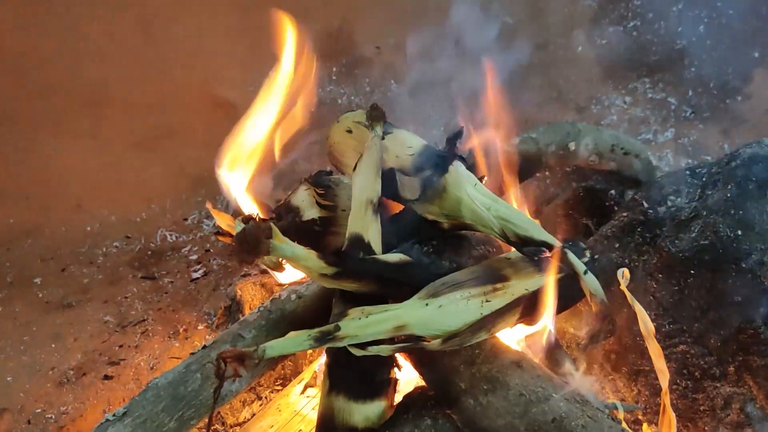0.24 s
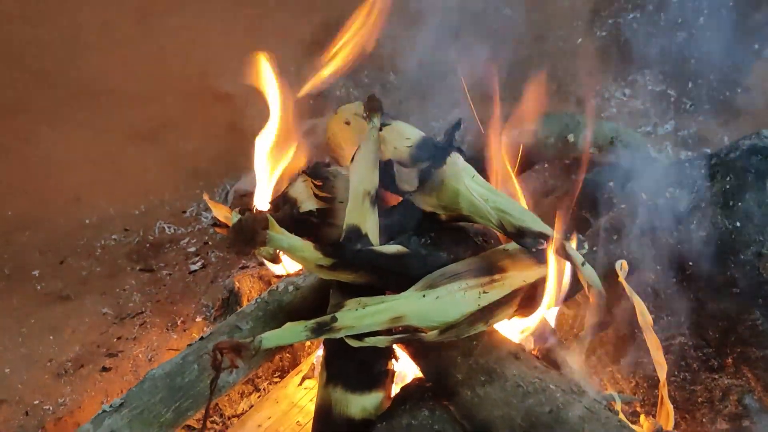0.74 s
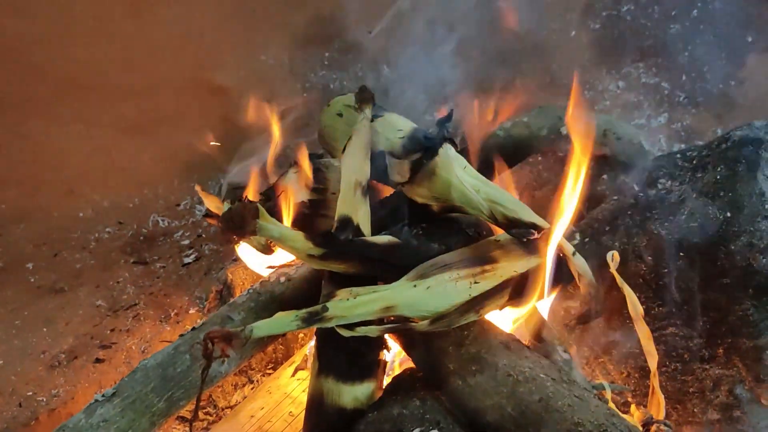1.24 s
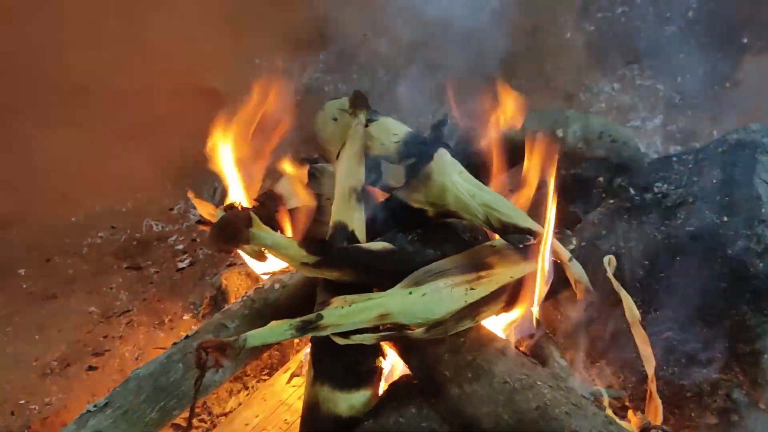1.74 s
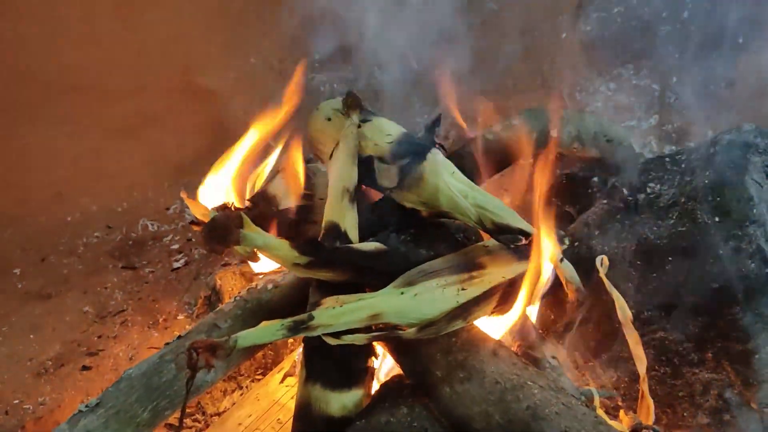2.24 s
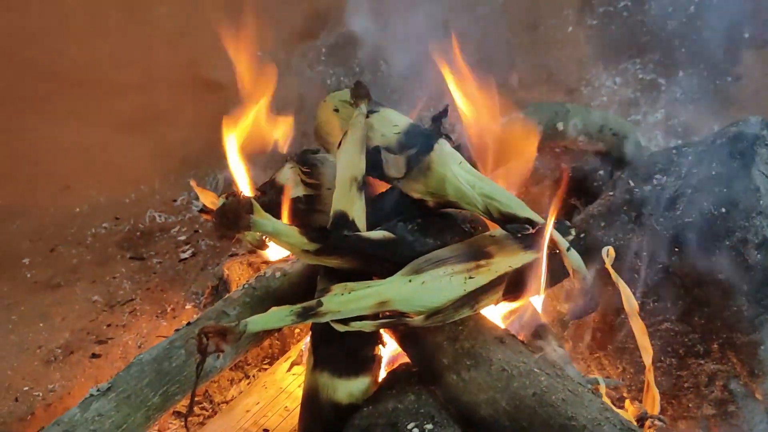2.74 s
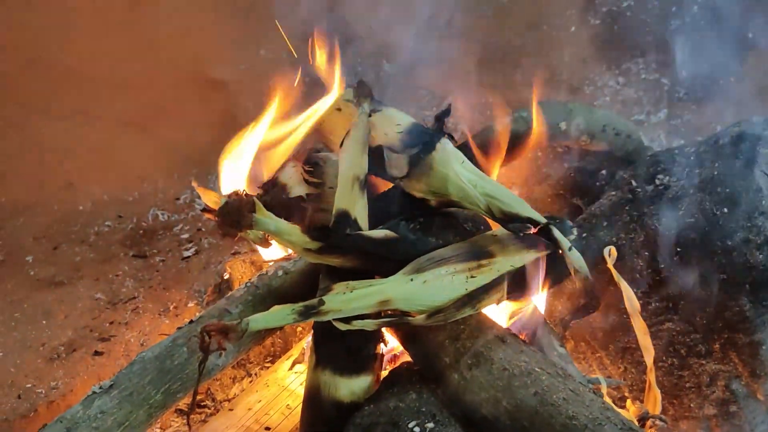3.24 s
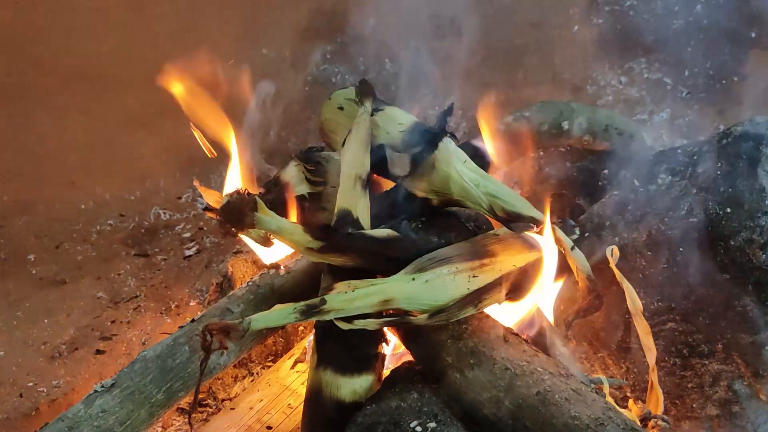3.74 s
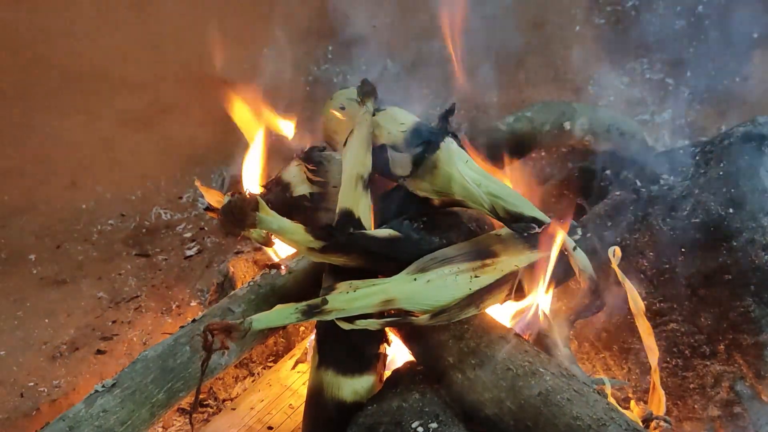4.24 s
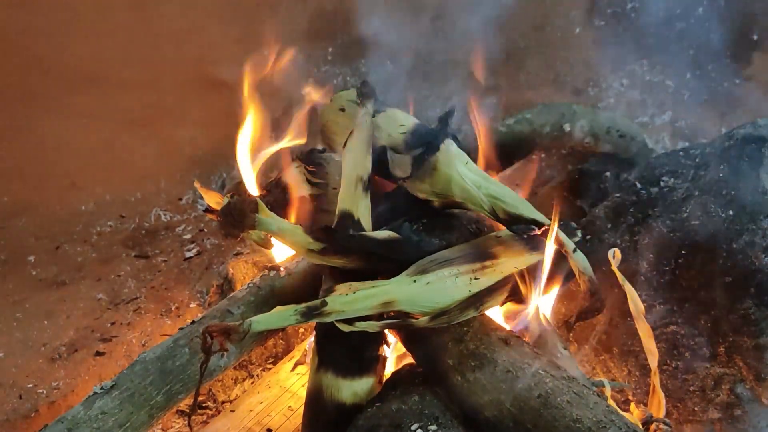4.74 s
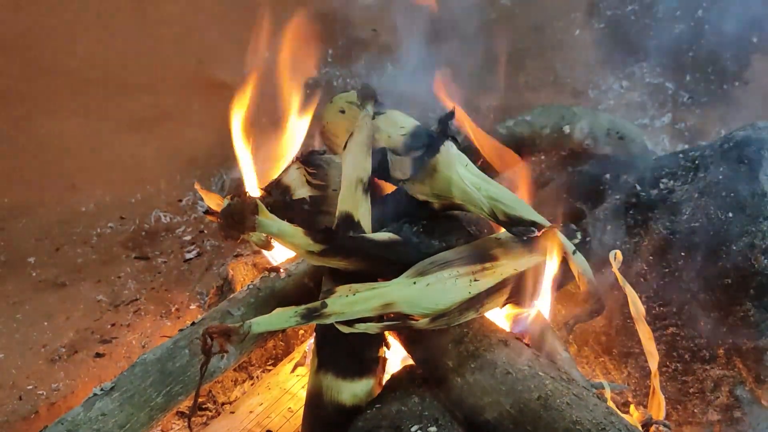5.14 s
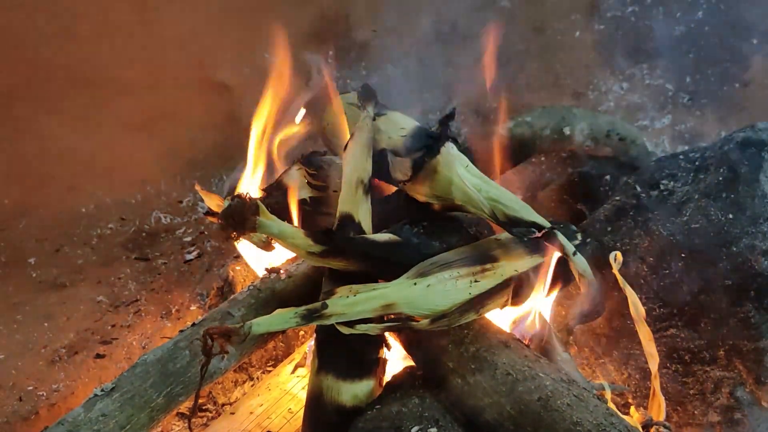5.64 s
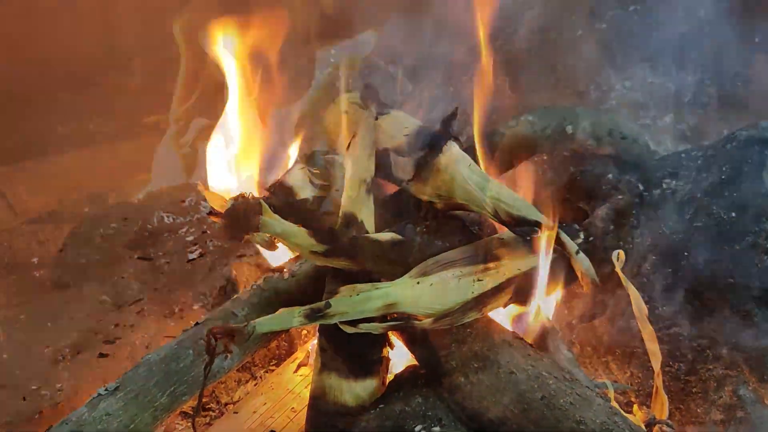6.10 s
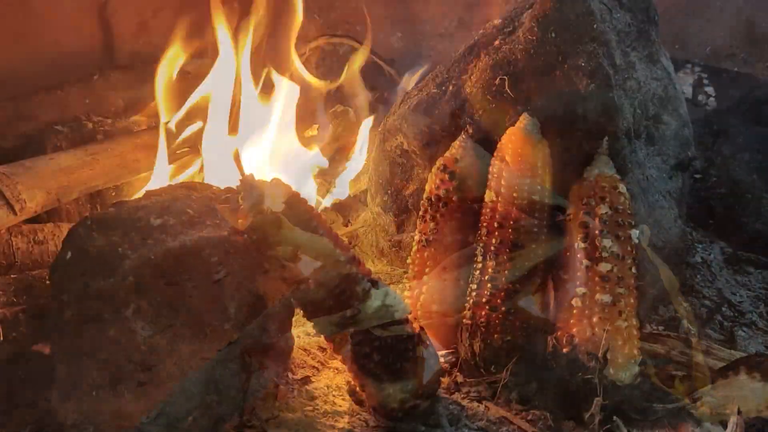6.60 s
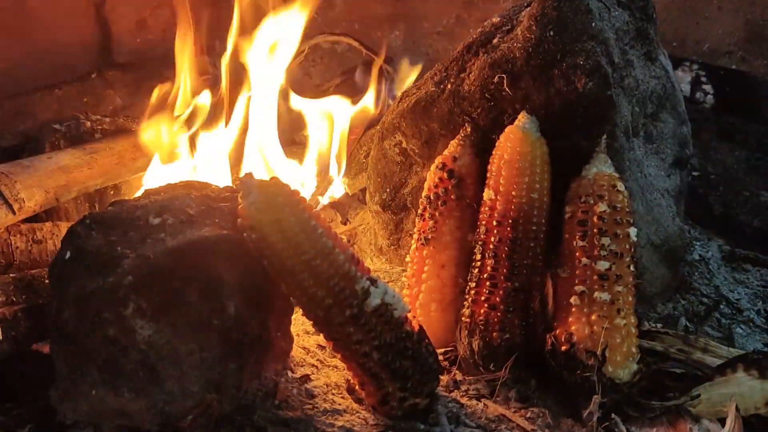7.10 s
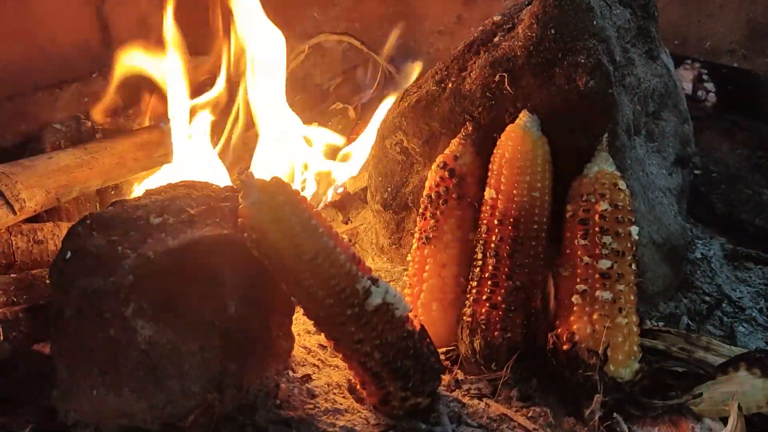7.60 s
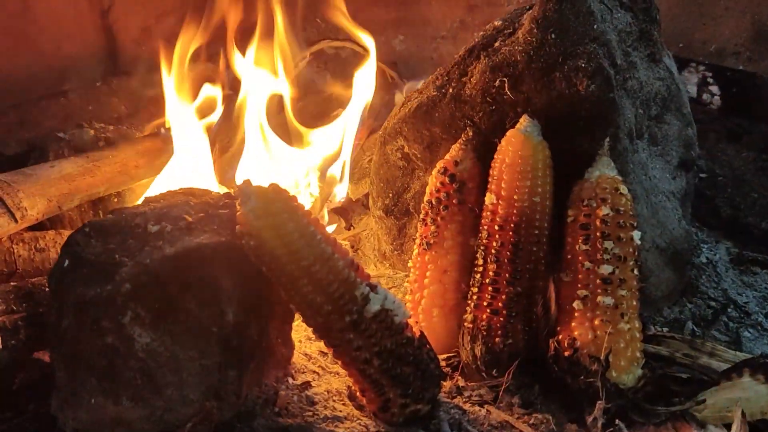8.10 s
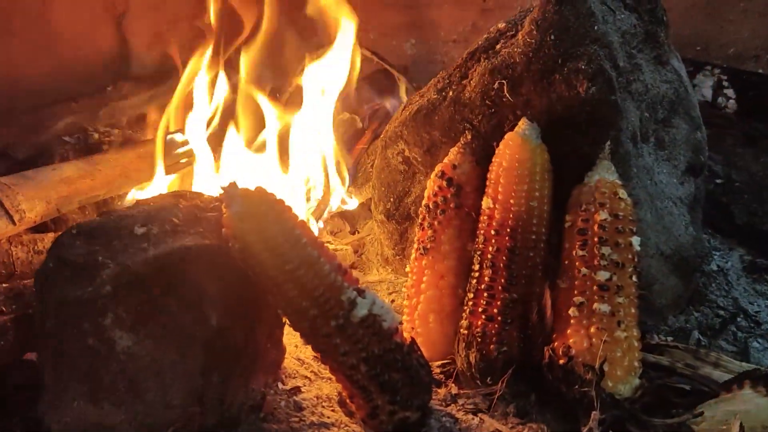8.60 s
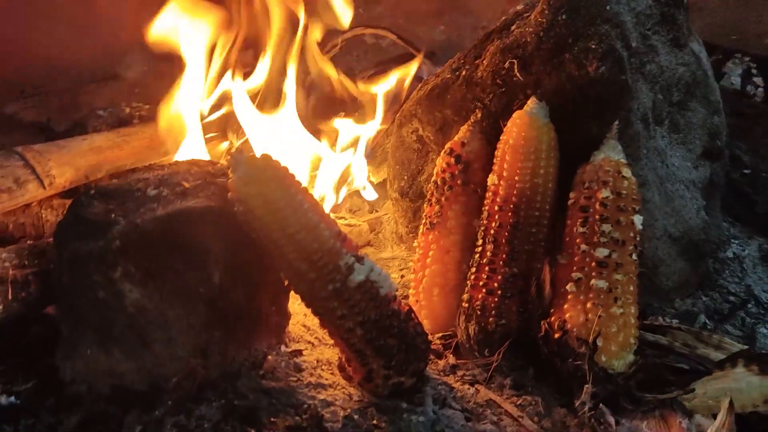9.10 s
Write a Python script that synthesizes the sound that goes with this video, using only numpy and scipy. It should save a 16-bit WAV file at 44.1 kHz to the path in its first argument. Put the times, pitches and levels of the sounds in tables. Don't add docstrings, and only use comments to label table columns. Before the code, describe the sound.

Steam sizzles and flames softly flutter as sticks snap and logs pop, over pulsing evening crickets and faint distant birds, dropping slightly quieter partway through.

```python
import sys
import numpy as np
from scipy import signal
from scipy.fft import rfft, irfft, next_fast_len
from scipy.io import wavfile
from scipy.ndimage import uniform_filter1d

SR = 44100
rng = np.random.default_rng(int(sys.argv[2]) if len(sys.argv) > 2 else 0)


def convert_level_to_amplitude(level_db):
    exponent = np.asarray(level_db, float) / 20
    return 10 ** exponent


def dump(signal):
    limited = np.clip(np.atleast_2d(signal).T, -1, 1)
    pcm = np.round(limited * 32767).astype(np.int16)
    wavfile.write(sys.argv[1], SR, pcm)


N = 412335
CHANGE_S = 5.926


def per_view(levels):
    return np.where(np.arange(N) / SR < CHANGE_S, *levels)


def unit(x):
    return x / np.sqrt(np.mean(x ** 2) + 1e-20)


def along(points, hz):
    f, v = np.transpose(points)
    return np.interp(np.log(hz + 1), np.log(f + 1), v)


def curves(tables):
    s, *columns = np.vstack(tables).T
    return [np.interp(np.arange(N) / SR, s, column) for column in columns]


def wobble(rate_hz):
    return np.interp(np.arange(N) * rate_hz / SR, np.arange(400), rng.standard_normal(400))


def filtered(x, response):
    m = next_fast_len(x.shape[-1] + 4096)
    return irfft(rfft(x, m) * response(np.fft.rfftfreq(m, 1 / SR)), m)[..., :x.shape[-1]]


def peak(f, hz, width_hz):
    return 1j * f * width_hz / (hz * hz - f * f + 1j * f * width_hz + 1e-9)


def causal(points, f):
    cepstrum = irfft(np.log(convert_level_to_amplitude(along(points, f))))
    cepstrum[1:len(f) - 1] *= 2
    cepstrum[len(f):] = 0
    return np.exp(rfft(cepstrum))


def sides(db):
    return convert_level_to_amplitude([[db / 2], [-db / 2]])


def add(out, s, x):
    part = out[:, round(s * SR):][:, :x.shape[-1]]
    part += x[:, :part.shape[-1]]


# pitch_hz, likeness (1 = the same)
ALIKE = [(60, 0.22), (180, 0.76), (540, 0.17), (1640, -0.012), (4940, 0.61), (14900, -0.01)]


def rush(spectrum):
    def turn(hz):
        return np.arccos(np.clip(along(ALIKE, hz), -1, 1)) / 2

    def response(hz):
        return convert_level_to_amplitude(along(spectrum, hz)) * [np.cos(turn(hz)), np.sin(turn(hz))]

    mid, side = filtered(rng.standard_normal((2, N)), response)
    return unit(np.array([mid + side, mid - side]))


# pitch_hz, width_hz, level_db
PORTS = [(11060, 1530, 17), (8670, 950, 16.5)]


def ports(x):
    return filtered(x, lambda f: np.array([1 + convert_level_to_amplitude(db) * peak(f, hz, width) for hz, width, db in PORTS]))


# pitch_hz, decay_s (to fall 60 dB)
YARD = [(150, 0.17), (700, 0.044), (2000, 0.23), (8000, 0.089), (14000, 0.21), (14700, 0.0084)]


def yard(x, distance=1):
    hz, t, z = signal.stft(rng.standard_normal((2, SR // 5)), SR, nperseg=128)
    decay = convert_level_to_amplitude(-60 * t / along(YARD, hz)[:, None] / distance)
    tail = signal.istft(z * decay, SR, nperseg=128)[1]
    return signal.fftconvolve(x, tail / np.linalg.norm(tail[0]), axes=1)


# pitch_hz, level_db (per Hz)
RUMBLE = [(8.8, -20), (15, 10), (32, -11.5), (50, -3), (70, -17), (130, -10.5), (219, -22), (312, -23.5),
          (400, -30.5), (520, -44), (880, -120)]
# pitch_hz, level_db (per Hz)
AIR = [(150, -19), (250, -8.5), (450, -9.5), (740, -7.5), (980, -12.5), (1640, -11.5), (2400, -7.5),
       (3200, -6.5), (4400, -5), (5700, -51.5), (9000, -120)]
# pitch_hz, level_db (per Hz)
HISS = [(5000, -36), (7500, 9.5), (11000, 3), (15000, 4)]
# pitch_hz, level_db (per Hz)
SIZZLE = [(3000, -62), (4500, -19), (7100, 2), (7700, 7), (9000, 2), (10500, 1.5), (12000, -4),
          (15000, 1.5)]
# time_s, level_db
FLAME = [
    [(0.0, -62), (1.84, -60), (2.34, -62.5), (3.39, -59.5), (3.54, -60.5), (5.77, -62), (5.85, -63.5)],
    [(6.2, -59), (6.59, -62), (7.14, -58.5), (7.28, -62), (8.16, -60), (8.31, -61.5), (9.35, -60.5)],
]
# time_s, level_db
SAP = [
    [(0.0, -49), (3.22, -47), (5.77, -48), (5.85, -48)],
    [(6.2, -53.5), (6.25, -54.5), (7.34, -55), (9.35, -54.5)],
]


def flames():
    (flame_db,), (sizzle_db,) = curves(FLAME), curves(SAP)
    rumble = convert_level_to_amplitude(flame_db + 4.0 + 0.3 * wobble(3.5) + 1.7 * wobble(14)) * rush(RUMBLE)
    air_db = per_view((-63.5, -65.5)) + 0.42 * wobble(8)
    air = convert_level_to_amplitude(air_db) * (rush(AIR) + convert_level_to_amplitude(-3.0) * rush(HISS))
    burst_size = convert_level_to_amplitude(np.minimum(4 * rng.exponential(size=(2, N)), 18))
    bursts = (rng.random((2, N)) < 900 / SR) * burst_size * rng.standard_normal((2, N))
    steam = rng.standard_normal((2, N)) + 0.38 * unit(bursts)
    sizzle = unit(ports(filtered(steam, lambda hz: convert_level_to_amplitude(along(SIZZLE, hz)))))
    return rumble + air + convert_level_to_amplitude(sizzle_db - 3.5 + 0.27 * wobble(35)) * sizzle


# start_s, peak_db, pitch_hz
FLAPS = [(0.015, -43.5, 159), (0.323, -50, 131), (0.878, -51, 89.5), (1.441, -51, 82), (1.567, -46, 79),
         (3.043, -71, 299), (3.617, -36, 159), (6.222, -55, 117), (6.271, -52, 144), (7.04, -55, 180),
         (7.132, -47, 108), (8.002, -45, 157), (8.724, -52.5, 188), (9.224, -50, 127)]


def flaps():
    out, t = np.zeros((2, N)), np.arange(SR // 10) / SR
    for s, db, hz in FLAPS:
        push = np.sin(2 * np.pi * hz * t) * (1 - np.exp(-t / 0.00053))
        add(out, s, convert_level_to_amplitude(db - 60 * t / 0.089) * push * np.ones((2, 1)))
    return out


# pitch_hz, level_db
CRACK = [(1200, -47), (2200, -6), (2850, -7.5), (3900, -3.5), (6000, -2), (9000, -4.5), (12500, -10.5),
         (14300, -15), (14600, -1)]
# start_s, peak_db, knock_db, left_over_right_db, echo_db
HUSKS = [(1.345, -44.2, -22, 14, 15), (1.675, -43.5, -11, 2, -17), (2.0994, -25, -59, 5, -7),
         (3.3038, -35.7, -30.2, -18, 0), (4.6507, -30, -31, -16, -3), (5.194, -18, -37, -1, -9),
         (5.3795, -34.2, -21, -10, -10), (6.309, -47.2, -33.2, 0, 5), (6.8199, -34, -49, 1, -2),
         (7.1827, -28.5, -57, 6, -2), (7.4245, -38, -28.2, 2, -6), (8.087, -50.2, -11.7, -15, 4),
         (8.769, -31.5, -25.2, -17, -21)]
STICKS = [
    (1.3595, -43, -16.5, 21, 2),
    (1.4489, -31.5, -26, 11, 1),
    (1.4556, -20, -31.5, 19, -19),
    (1.5905, -24.5, -25.5, 22, -14),
    (1.8359, -22, -27, 29, -21),
]
LOGS = [(1.578, -36, -11.5, 10.5, -7), (3.0478, -2.5, -27.5, 5, -5), (3.623, -2.5, -27, 0.5, -5.5),
        (6.9689, -22.5, -29.5, -1, -0.5), (8.1925, -36.5, -40, 3, 1), (8.4265, -33, -37, 9, -5),
        (8.703, -42, -26, -15, -7), (8.851, -40, -16.5, -16, 2), (8.9116, -29, -34, 3, -1),
        (9.242, -38, -34, -26, -5), (9.329, -29.5, -38, 20, 0.5)]
STUMPS = [
    (6.0363, -30, -71, -9, -7),
    (6.2582, -46, -30, -1.5, -4),
    (6.671, -44, -27, -4, -6),
    (6.708, -33, -26, 3, -1.5),
    (7.844, -48, -22, -3, 7),
    (8.535, -48.5, -5, 8, 1),
]
KERNELS = [
    (6.1275, -27, -27, -12, -2),
    (6.9696, -36, -21, -2, 2),
    (1.591, -40, -24, 15, -12),
    (3.339, -44, -20, -6, -4),
    (5.1945, -40, -22, -2, -4),
]


def pops():
    out, t = np.zeros((2, N)), np.arange(SR // 20) / SR
    spike = 1. * (t[None] < 1 / SR)
    snap = filtered(spike, lambda f: causal(CRACK, f))[0, :256]
    snap_padded = np.pad(snap, (0, len(t) - len(snap)))

    def split_wood(knock_hz, width_hz, knock_db):
        splinters = .45 * convert_level_to_amplitude(-60 * t / .0065) * (t > 16 / SR) * rng.standard_normal((2, len(t)))
        splinters[:, 16:18] += [1.3, -1.3]
        bulk = min(700 / knock_hz, 1) ** 3

        def wood(f):
            thud = -0.6 * peak(f, 302, 200) + 0.41 * peak(f, 113, 55)
            thud = thud - 0.24 * peak(f, 1390, 300) + 0.36 * peak(f, 2310, 310)
            return peak(f, knock_hz, width_hz) ** 2 + bulk * thud

        def ground(f):
            return (1 - (1 - .6 * bulk) * peak(f, 2850, 900)) * (1 - bulk * peak(f, 1000, 300))

        crack = filtered(signal.fftconvolve(splinters, snap[None], axes=1)[:, :len(t)], ground)
        strike = spike + .12 * splinters
        return crack, convert_level_to_amplitude(knock_db + 37.5) * filtered(strike, lambda f: wood(f) * ground(f))

    fuels = [(2600, 2800, HUSKS), (1420, 2180, STICKS), (714, 234, LOGS), (450, 300, STUMPS),
             (3500, 660, KERNELS)]
    for knock_hz, width_hz, rows in fuels:
        for s, db, knock_db, pan_db, echo_db in rows:
            crack, knock = split_wood(knock_hz, width_hz, knock_db)
            add(out, s, convert_level_to_amplitude(db - 3.0) * sides(pan_db) * (crack + knock))
            add(out, s + .0028, convert_level_to_amplitude(db + 3.0 + echo_db) * yard(1.88 * snap_padded + 0.66 * knock))
    return out


# start_s, length_s, level_db, tilt_db (per octave), left_over_right_db
RUSTLES = [(1.362, 0.061, -55, -0.5, -9.5), (1.97, .06, -65, 5, 2), (2.555, 0.064, -72, 1, 6),
           (2.807, 0.092, -61, 1.5, -9), (3.337, 0.012, -55.5, 1.5, -10), (6.112, 0.056, -76, 6, -7),
           (4.652, 0.017, -59, 1, -7), (5.366, 0.039, -66, 3, 15), (7.425, 0.031, -66, -1, -4),
           (7.996, 0.032, -64.5, -32, -2), (8.087, 0.016, -62, -2, 3), (8.538, 0.036, -54.5, -3.5, 1.5),
           (8.724, 0.074, -66.5, -7.5, -18), (8.87, 0.058, -63, -5, -18.5), (8.908, 0.044, -49.5, -4, -2),
           (8.94, .1, -58, -5.5, -16.5), (9.126, 0.08, -58.5, -6.5, -4.5), (9.325, 0.025, -46, -11.5, 1)]


def rustles():
    out = np.zeros((2, N))
    for s, length, db, tilt_db, pan_db in RUSTLES:
        u = np.linspace(0, 1.6, round(1.6 * length * SR))
        near, apart = rng.standard_normal((1, len(u))), rng.standard_normal((2, len(u)))
        clumps = np.repeat(rng.standard_normal(len(u) // 130 + 1), 130)[:len(u)]
        grit = (near + 1.9 * apart) * convert_level_to_amplitude(1.54 * rng.standard_normal(len(u)) + 3.5 * clumps)
        puff = filtered(grit, lambda f: convert_level_to_amplitude(tilt_db * np.log2(f / 1000 + 1.15)) * peak(f, 1200, 4400))
        shape = np.minimum(u / 0.04, 1) * np.exp(-u ** 3)
        add(out, s, convert_level_to_amplitude(db) * sides(pan_db) * unit(puff) * shape)
    return out


def wings(strokes, hz, width_hz, swell_db):
    taps = (rng.random((2, N)) < strokes / SR) * rng.standard_normal((2, N)) * convert_level_to_amplitude(swell_db * wobble(30))
    return unit(filtered(taps, lambda f: peak(f, hz, width_hz) ** 3))


# middle_s, length_s, level_db
NEAR = [(0.213, 0.13, -50), (0.622, 0.17, -50), (1.03, 0.15, -48.5), (1.465, 0.1, -48.5),
        (1.88, 0.19, -50.5), (2.34, 0.12, -48.5), (2.768, 0.11, -48), (3.171, 0.071, -46),
        (3.59, 0.24, -49), (3.986, 0.11, -47.5), (4.397, 0.098, -48), (4.928, 0.1, -47),
        (5.366, 0.29, -49.5), (5.806, 0.14, -48.5)]
# middle_s, length_s, level_db, brightness (0-1)
OTHERS = [(.47, 0.18, -54, 0.66), (0.895, 0.14, -56, 0.5), (1.22, 0.12, -56, 0.7), (1.385, 0.085, -53, 0.1),
          (1.747, 0.11, -54.5, 0.7), (2.1, 0.071, -57, 0), (2.228, 0.07, -53, 1),
          (2.608, 0.14, -53.5, 0.54), (2.983, 0.1, -54, 0.85), (3.336, 0.065, -53.5, .4),
          (3.425, 0.14, -55, 0.3), (3.847, 0.11, -49, 0.55), (4.218, 0.18, -53, 0.56),
          (4.635, 0.14, -51.5, 0.7), (5.05, 0.21, -55, 0.56), (5.215, 0.18, -56.5, 0.66),
          (5.63, 0.092, -55, 0.9)]
# middle_s, length_s, level_db, brightness (0-1)
LATER = [(6.17, .06, -62, .1), (6.32, 0.072, -54.5, 0.33), (6.53, 0.13, -64, .1), (6.7, 0.098, -56, 0.28),
         (6.84, 0.082, -56.5, 0.32), (7.1, 0.16, -58, 0.088), (7.33, 0.051, -60, 0.81),
         (7.47, 0.17, -58, 0.1), (7.73, 0.11, -60.5, .2), (7.84, 0.09, -54.5, 0.48),
         (8.07, 0.098, -59.5, .1), (8.24, 0.12, -58, 0.18), (8.42, 0.14, -59, 0.16),
         (8.54, 0.081, -58, 0.27), (8.66, 0.092, -59.5, .4), (8.76, 0.074, -57, 0.14),
         (8.9, .09, -59, 0.23), (9.04, 0.097, -58, 0.19), (9.26, 0.088, -59.5, .3)]


def chirps():
    power = np.zeros((2, N))
    near = [(*row, 0.86) for row in NEAR]
    for s, length, db, bright in near + OTHERS + LATER:
        u = np.arange(-length * SR, length * SR) / (0.36 * length * SR)
        shape = np.exp(-np.abs(u) ** 3.2)
        share = np.clip(bright, 0, 1)
        beat = np.cos(2 * np.pi * 26 * (np.arange(len(shape)) / SR - length))
        strokes = 1 + (s > CHANGE_S) * np.outer([.3, .95], beat)
        add(power, s - length, convert_level_to_amplitude(2 * db) * shape * [[1 - share], [share]] * strokes)
    return power


def crickets():
    low, high = chirps()
    field_power = convert_level_to_amplitude(2 * per_view((-53.5, -57.5))) + 3.2 * low
    field = np.sqrt(field_power) * wings(6000, hz=5128, width_hz=1350, swell_db=1.3)
    near = np.sqrt(high) * wings(1500, hz=5605, width_hz=1200, swell_db=-2.5)
    overtone = np.sqrt(high) * convert_level_to_amplitude(-6) * sides(9) * wings(1500, hz=11200, width_hz=1300, swell_db=2)
    trill_db = per_view((-55, -56.5)) + 0.19 * wobble(4.5)
    trill = convert_level_to_amplitude(trill_db) * wings(6000, hz=6494, width_hz=750, swell_db=-2.0)
    return field + near + overtone + trill


# start_s, length_s, first_hz, last_hz, level_db
SONG = [(0.92, 0.032, 2590, 2690, -75), (1.096, 0.073, 2450, 2640, -75.5), (1.151, 0.046, 2060, 2060, -76),
        (1.955, 0.043, 2490, 2460, -73.5), (1.969, 0.034, 2650, 2710, -73), (1.99, 0.031, 2920, 3140, -74),
        (1.993, 0.037, 3300, 3370, -76), (2.015, 0.027, 2660, 2720, -79), (2.156, 0.031, 2430, 2465, -60.5),
        (2.164, .025, 2310, 2310, -72), (2.224, 0.044, 2025, 2065, -66.5), (2.245, .028, 2170, 2160, -70),
        (2.259, 0.064, 2531, 2444, -59.5), (2.27, 0.04, 2110, 2060, -78), (2.35, .06, 2510, 2510, -84),
        (2.398, 0.037, 2166, 2240, -68), (2.401, 0.049, 2040, 2110, -72), (2.445, 0.042, 2216, 2180, -71),
        (2.48, 0.044, 1780, 1880, -71), (2.49, .025, 2150, 2120, -75), (2.543, 0.055, 1955, 2010, -74),
        (2.55, 0.034, 2320, 2400, -75), (2.575, 0.02, 2190, 2200, -71), (2.585, 0.035, 2310, 2330, -75),
        (2.588, 0.044, 2120, 2030, -77), (2.63, 0.035, 2250, 2260, -79)]
# start_s, length_s, first_hz, last_hz, level_db
CALLS_FAR = [
    (6.325, .18, 8950, 8900, -68),
    (6.62, .12, 8950, 8930, -67),
    (7.261, .14, 2620, 2620, -77),
    (7.49, .2, 3800, 3240, -77),
    (7.88, .15, 3850, 3350, -78),
    (6.285, .068, 2287, 2150, -79),
    (6.1, .06, 2720, 2700, -73),
]


def whistles():
    out = np.zeros((2, N))
    notes = [(*n, 23) for n in SONG] + [(*n, -9) for n in CALLS_FAR]
    for s, length, first_hz, last_hz, db, pan_db in notes:
        count = round(length * SR)

        def shake(rate_hz):
            return np.interp(np.linspace(0, length * rate_hz, count), np.arange(99), rng.standard_normal(99))

        pitch_hz = np.linspace(first_hz, last_hz, count) + 18 * shake(90)
        breath = 1 + .35 * shake(350)
        tone = np.sin(2 * np.pi * np.cumsum(pitch_hz) / SR) * np.hanning(count) ** .5 * breath
        add(out, s, convert_level_to_amplitude(db + 9) * sides(pan_db) * np.array([tone, -tone]))
        add(out, s + 0.015, convert_level_to_amplitude(db + 6.5) * yard(tone[None], distance=1.4))
    return out


def frogs():
    return convert_level_to_amplitude(per_view((-70, -83))) * wings(2500, hz=2450, width_hz=1400, swell_db=-1.5)


def ducking(ahead_s, ahead_db, depth_db, above_db, recovery_s):
    t = np.arange(N) / SR
    mute_db = np.zeros(N)
    for s, db, *_ in LOGS:
        if db > above_db:
            creeping_back = depth_db * np.exp(-((t - s) / recovery_s) ** 4)
            mute_db += (t > s - ahead_s) * np.where(t < s, ahead_db, creeping_back)
    return convert_level_to_amplitude(-mute_db)


def scene():
    background = flames() + flaps() + crickets() + frogs() + whistles()
    gain = ducking(ahead_s=0.01, ahead_db=12, depth_db=13, above_db=-14, recovery_s=0.077)
    return background * gain + ports(pops() + rustles())


def fade_in():
    since = np.arange(N) / SR - CHANGE_S
    rise = np.clip(.03 + since / 0.21, 0, 1)
    return np.where(since < 0, 1, np.where(since < .014, convert_level_to_amplitude(-49), rise))


# pitch_hz, level_db
EDGE = [(14220, 4.5), (14320, -17), (15700, -38), (16500, -60)]
# pitch_hz, level_db
MASK = [(1200, -32), (1800, -22), (2600, -14.5), (3000, -12.5), (3600, -11.5), (4350, -8), (4450, -26),
        (5700, -24), (5920, -11), (6150, -26), (6850, -24), (7050, -8), (7300, -8), (7500, -24),
        (10500, -24), (12000, -23), (14200, -22), (14330, -16), (16000, -24)]


def band_limits(x):
    hz, t, z = signal.stft(filtered(x, lambda hz: convert_level_to_amplitude(along(EDGE, hz))), SR, "cosine", nperseg=2048)
    power = np.abs(z) ** 2
    band = np.unique(np.round(36 * np.log(hz + 300)), return_inverse=True)[1]
    in_band = np.eye(band.max() + 1)[band].T / np.bincount(band)[:, None]
    trill = power[:, (hz > 6100) & (hz < 6900)].mean(axis=(0, 1))
    masker = np.exp(uniform_filter1d(np.log(trill + 1e-14), size=15))
    masker = masker * np.where(t > CHANGE_S + .1, convert_level_to_amplitude(3.5), 1)
    scatter = convert_level_to_amplitude(7 * rng.standard_normal((len(in_band), z.shape[2])))
    strong = (in_band @ power * scatter)[:, band] > masker * convert_level_to_amplitude(2 * along(MASK, hz))[:, None]
    return signal.istft(z * strong, SR, "cosine", nperseg=2048)[1][:, :N]


def band_limit(x):
    return signal.sosfilt(signal.butter(12, 15470, fs=SR, output="sos"), x)


def record(dry):
    limited = dry / (1 + (dry / .8) ** 4) ** (1 / 4)
    mix = band_limits(limited) * fade_in()
    return band_limit(mix)


dry = scene()
out = record(dry)
dump(out)
```